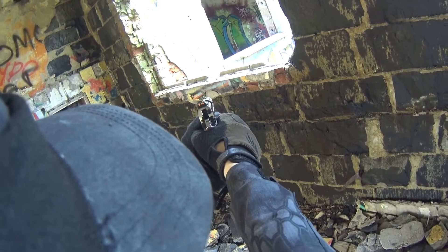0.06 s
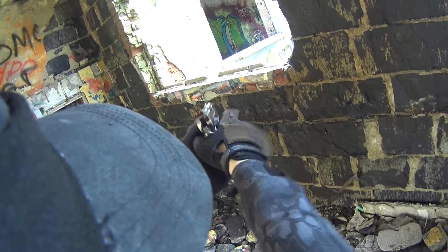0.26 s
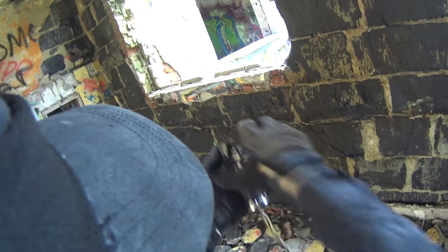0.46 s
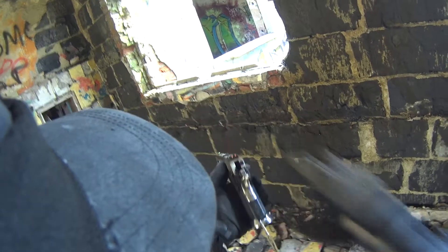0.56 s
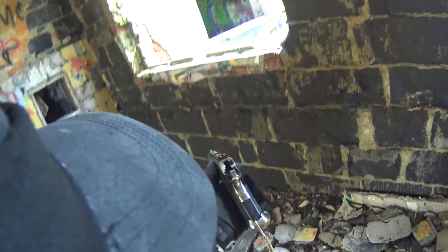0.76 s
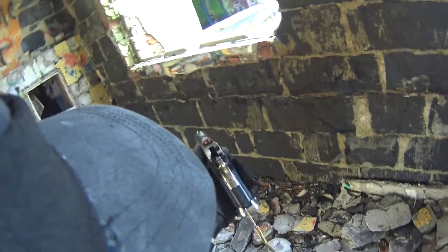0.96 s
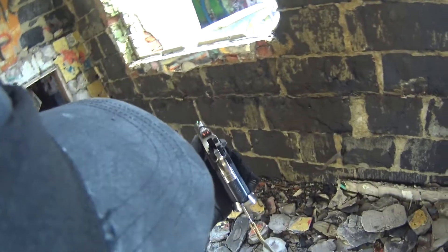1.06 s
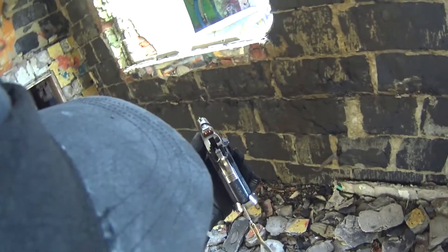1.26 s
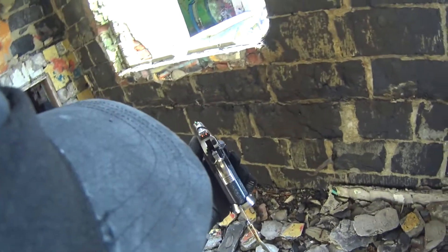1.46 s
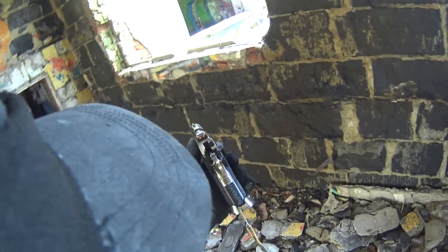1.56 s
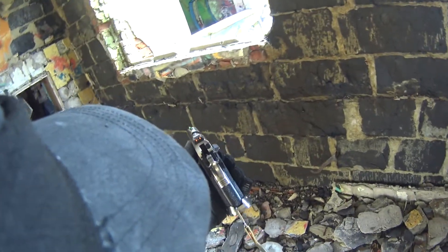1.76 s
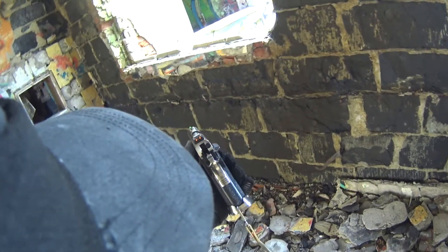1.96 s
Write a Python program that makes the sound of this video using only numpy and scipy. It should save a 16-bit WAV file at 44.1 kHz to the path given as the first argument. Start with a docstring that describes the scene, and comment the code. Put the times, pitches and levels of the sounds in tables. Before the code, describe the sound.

Toy pistol clicking and snapping in a gloved hand, with sleeve rustle and faint birds.

```python
"""Toy pistol in a brick ruin

A gloved hand works a toy pistol: a double click, a bright snap and small ticks ring its frame
and catch, and soft knocks land on the grip, over the rustle of glove and sleeve. The bare walls
answer faintly; distant birds whistle outside over a low rumble of air."""
import sys
import numpy as np
from scipy import signal
from scipy.fft import rfft, irfft, next_fast_len
from scipy.io import wavfile
from scipy.ndimage import map_coordinates

SR = 44100
rng = np.random.default_rng(int(sys.argv[2]) if len(sys.argv) > 2 else 0)


def digitize_waveform(pressure):
    """Quantize a signal to 16-bit integers and store it at the path in sys.argv[1].

    Rows of a 2-D input are taken as channels; values are limited to [-1, 1].
    """
    field = np.atleast_2d(pressure).T
    bounded = np.clip(field, -1, 1)
    quanta = np.round(bounded * 32767).astype(np.int16)
    wavfile.write(sys.argv[1], SR, quanta)


N = 88200


def amp(db):
    """Decibels to gain."""
    return 10 ** (np.asarray(db) / 20)


def unit(x):
    """x at rms 1."""
    return x / np.sqrt(np.mean(x ** 2) + 1e-20)


def along(points, hz):
    """Read a curve of (frequency [Hz], value) points on a log axis."""
    freqs, values = np.transpose(points)
    return np.interp(np.log(hz + 1), np.log(freqs + 1), values)


def fade(t, t60):
    """Exponential decay, 60 dB down at t60 seconds."""
    return np.exp(-np.log(1000) * t / t60)


def wobble(rate):
    """A smooth random curve, rate knots a second."""
    return map_coordinates(rng.standard_normal(int(N * rate / SR) + 4), [np.arange(N) * rate / SR])


def filtered(x, response):
    """EQ x with a gain that is a function of frequency."""
    n = x.shape[-1]
    padded = next_fast_len(n + 8192)
    return irfft(rfft(x, padded) * response(np.fft.rfftfreq(padded, 1 / SR)), padded)[..., :n]


def causal(gain):
    """The most compact (minimum-phase) impulse response with these gains."""
    cepstrum = irfft(np.log(np.maximum(gain, 1e-6)))
    half = len(cepstrum) // 2
    cepstrum[1:half] *= 2
    cepstrum[half + 1:] = 0
    return irfft(np.exp(rfft(cepstrum)))


def add(track, start, sound):
    """Mix a sound into a track at start seconds."""
    i = round(start * SR)
    part = sound[max(-i, 0):max(N - i, 0)]
    track[max(i, 0):][:len(part)] += part


# Stereo image, widest in the low mids (frequency [Hz], left-right correlation [0-1])
STEREO_IMAGE = [(30, 0.97), (70, 0.98), (170, 0.82), (350, 0.092), (700, 0.067), (1400, 0.72), (2800, 0.8),
                (8000, 0.77)]
def spread(pair, colour):
    """Two unrelated signals become a coloured stereo sound of rms 1."""
    def mid_side_gains(hz):
        angle = np.arccos(np.clip(along(STEREO_IMAGE, hz), -1, 1)) / 2
        return amp(along(colour, hz)) * [np.cos(angle), np.sin(angle)]
    mid, side = filtered(pair, mid_side_gains)
    return unit(np.array([mid + side, mid - side]))


def reverb(x, decay):
    """Diffuse stereo reflections of x at about its energy; decay is (frequency [Hz], t60 [s])."""
    hz, t, noise = signal.stft(rng.standard_normal((2, SR // 2)), SR, nperseg=256)
    tail = signal.istft(noise * fade(t, along(decay, hz)[:, None]), SR, nperseg=256)[1]
    tail = spread(tail, [(1, 0)])
    return signal.fftconvolve(x[None], tail / np.linalg.norm(tail[0]), axes=1)[:, :N]


# EQ of the air bed (frequency [Hz], gain [dB])
AIR_EQ = [(10, -16), (30, -2), (60, -9), (120, -13.5), (250, -15.5), (600, -18.5), (1000, -22.5),
          (2500, -46), (5000, -38), (9000, -45), (11000, -46), (12000, -102)]
def air():
    """Outdoor air: a steady, low rumble of noise."""
    return amp(-56.5) * spread(rng.standard_normal((2, N)), AIR_EQ)


# Bird calls (time [s], length [s], start pitch [Hz], end pitch [Hz], level [dB], rasp [0-1])
BIRD_CALLS = [(-.04, 0.21, 3990, 4044, -52, 0.29), (-.02, 0.14, 2794, 2680, -53.5, 0.16),
              (0.242, 0.19, 4970, 4920, -49, 0.5), (0.528, 0.079, 5930, 5500, -54, 0.77),
              (0.721, 0.063, 3450, 3400, -54, 0.17), (0.8, 0.27, 4136, 4080, -58.5, 0.16),
              (.88, 0.088, 2730, 2910, -52.5, 0.22), (.99, 0.07, 3480, 3490, -55.5, 0.19),
              (1.212, 0.053, 3445, 3510, -51, 0), (1.238, 0.322, 4110, 4085, -59.5, 0.02),
              (1.28, 0.15, 2506, 2545, -55.5, .2), (1.577, 0.22, 3564, 3517, -53.5, 0),
              (1.68, 0.1, 4660, 4620, -60, 0.12), (1.704, 0.12, 2910, 2890, -57.5, 0.03),
              (1.81, 0.13, 4700, 4600, -62, 0), (1.928, 0.062, 2750, 2810, -56.5, 0.26)]
def birds():
    """Thin, trembling whistles, smeared by distance; in a raspy call pitch and level shake fast."""
    waver_hz, tremble_db, rasp_hz, rasp_db = 30.3, 1.5, 220, 3  # modulation depths
    edge_s, sag_db, trees_t60_s = 0.0096, 6, 0.45
    calls = np.zeros(N)
    for start, length, start_hz, end_hz, db, rasp in BIRD_CALLS:
        t = np.arange(int(length * SR)) / SR
        glide = start_hz + (end_hz - start_hz) * t / length
        waver = waver_hz * wobble(311.4) + rasp * rasp_hz * wobble(912)
        tone = np.sin(2 * np.pi * np.cumsum(glide + waver[:len(t)]) / SR)
        tremble = amp(tremble_db * wobble(111.7) + rasp * rasp_db * wobble(413))
        edges = np.clip(np.minimum(t, length - t) / edge_s, 0, 1)
        sag = amp(sag_db * (.5 - t / length))  # each call weakens as it goes
        add(calls, start, amp(db) * edges * sag * unit(tremble[:len(t)]) * tone)
    return amp(-1) * calls + amp(-7) * reverb(calls, [(3000, trees_t60_s)])


# Fader ride of the rustle (time [s], level [dB])
RUSTLE_RIDE = [(0, -58), (.16, -54.5), (0.209, -46.5), (.28, -47.5), (.34, -47.5), (0.419, -45.5),
               (.55, -47.5), (.62, -42.5), (.72, -45.5), (.8, -46.5), (0.867, -44.5), (.95, -52),
               (1.05, -49.5), (1.17, -51.5), (1.541, -54), (1.61, -48.5), (1.68, -58), (1.8, -53),
               (2, -55.5)]
# EQ of the cloth (frequency [Hz], gain [dB])
CLOTH_EQ = [(200, -23), (600, -12), (1050, -16), (1270, -0.5), (1550, -7.5), (1800, -2), (2050, -9),
            (2500, 1.5), (3200, -7.5), (4800, -10), (6000, -18.5), (8400, -23), (9500, -35.5),
            (11000, -34.5), (12000, -133)]
def rustle():
    """Glove and sleeve rub: a fluttering hiss dotted with tiny crease ticks."""
    creases_per_s, crease_db, scatter_db, flutter_db = 400, -10, 8, 1
    level_db = np.interp(np.arange(N) / SR, *np.transpose(RUSTLE_RIDE)) + flutter_db * wobble(44.81)
    onsets = rng.random((2, N)) < creases_per_s / SR
    creases = onsets * amp(scatter_db * np.clip(rng.standard_normal((2, N)), -2, 2))
    hiss = rng.standard_normal((2, N))
    return amp(level_db) * spread(hiss + amp(crease_db) * unit(creases), CLOTH_EQ)


def strike(modes, tilt_db, contact_hz):
    """One hit of peak 1: damped modes, boosted at the contact's pitch and rolled off above it."""
    shell_hz = 1323  # the small shell radiates little below this
    boost_db, boost_octaves = 4, .25
    chatter_db, chatter_t60_s = -11, 0.021
    size = SR // 10
    hz, t = np.fft.rfftfreq(size, 1 / SR), np.arange(size) / SR
    power = sum(amp(2 * db) / (1 + ((hz - mode_hz) * 2 * np.pi * t60 / np.log(1000)) ** 2)
                for mode_hz, db, t60 in modes)
    passband = 1 / np.sqrt((1 + (shell_hz / (hz + 1)) ** 16) * (1 + (hz / contact_hz) ** 8))
    tilt = amp(tilt_db * np.log2(np.maximum(hz / shell_hz, 1)))
    boost = amp(boost_db * np.exp(-(np.log2((hz + 1) / contact_hz) / boost_octaves) ** 2))
    ring = causal(np.sqrt(power) * passband * tilt * boost)
    burst = fade(t, chatter_t60_s) * rng.standard_normal(size)
    chatter = signal.fftconvolve(ring, burst / np.linalg.norm(burst))[:size]
    hit = ring + amp(chatter_db) * chatter
    return hit / np.abs(hit).max()


# Ring of the frame (frequency [Hz], level [dB], t60 [s])
FRAME_MODES = [(1330, -13, .014), (1900, -2.5, .009), (2450, 2, .009), (2780, 1, .007), (3170, 3, .009),
               (4020, -9, .008), (4450, -9, .008), (5750, -15, .004), (7500, -22, .003)]
# Light taps (time [s], level [dB], brightness [dB/octave], contact pitch [Hz])
CLICK_CUES = [(0.162, -36, -2, 1740), (0.2182, -19.5, 0.5, 6700), (0.2322, -15, 1, 7300),
              (0.2786, -31, 0, 4060), (0.314, -36, 1, 2760), (0.563, -36, -3, 3500),
              (1.015, -31.5, -8.5, 4900), (1.5514, -40.5, -17, 2000), (1.9125, -39.5, -15, 1820),
              (1.9704, -32, -9, 2300)]
def clicks():
    """Parts of the mechanism tap the frame: a double click and small ticks."""
    out = np.zeros(N)
    for start, db, tilt_db, contact_hz in CLICK_CUES:
        add(out, start, amp(db) * strike(FRAME_MODES, tilt_db, contact_hz))
    return out


# Reverb time of the ruin (frequency [Hz], t60 [s])
WALL_DECAY = [(300, 0.91), (2500, 0.4), (7000, 0.2), (11500, 0.024)]
def walls(pistol):
    """Bare walls answer the pistol with tight early reflections and a faint, dark tail."""
    brick_hz = 6200  # rough brick swallows the treble above this
    dulled = filtered(pistol, lambda hz: 1 / np.sqrt(1 + (hz / brick_hz) ** 4))
    tail = amp(-12.5) * reverb(dulled, WALL_DECAY)
    early = amp(-6.5) * reverb(dulled, [(3000, 0.031)])
    return early + tail


# Ring of the catch (frequency [Hz], level [dB], t60 [s])
CATCH_MODES = [(1750, 6, .03), (2300, -1, .008), (2720, 1, .009), (3520, 3, .011), (3800, 7, .011),
               (4430, -5, .011), (5190, 0, .011), (5860, 0, .011), (6800, 5, .008), (7850, 1, .007),
               (8400, -2, .008), (11000, -14, .006)]
# Light touches, and the snap's slip, hit and rebound (time [s], level [dB], contact pitch [Hz])
CATCH_CUES = [(0.3743, -35, 6600), (0.5139, -24.5, 4700), (.586, -30, 11600), (0.5866, -12.3, 11800),
              (0.5877, -23, 11500), (0.7564, -23, 5000)]
def snap():
    """The catch is nudged, snaps home and is touched again."""
    out = np.zeros(N)
    for start, db, contact_hz in CATCH_CUES:
        add(out, start, amp(db) * strike(CATCH_MODES, tilt_db=0, contact_hz=contact_hz))
    return out


# Dull scuffs (peak time [s], half length [s], level [dB], pitch [Hz])
SCUFF_CUES = [(0.476, 0.067, -60, 173), (0.653, 0.12, -59.5, 93), (0.716, 0.032, -53.5, 276),
              (1.035, 0.047, -54.5, 490)]
def scuffs():
    """The moving arm brushes the clothes in short, low swells of noise."""
    step_octaves = 0.57
    out, t = np.zeros((2, N)), np.arange(N) / SR
    for peak_s, half_s, db, hz in SCUFF_CUES:
        band = [(hz * 2 ** (k * step_octaves), -5 * k * k) for k in range(-4, 5)]
        swell = np.exp(-((t - peak_s) / half_s) ** 2)
        out += amp(db) * swell * spread(rng.standard_normal((2, N)), band)
    return out


# Hand on grip (time [s], level [dB], pitch [Hz], t60 [s], frame ring against the thud [dB])
KNOCK_CUES = [(0.6441, -33, 726, 0.0089, 0.5), (0.8, -45, 188, 0.017, 2), (0.895, -31, 610, 0.013, -8),
              (1.1236, -38.5, 330, 0.012, -2.5), (1.9072, -40, 137, 0.0063, -5)]
def knocks():
    """A padded contact gives a short low thud and a dull ring of the frame."""
    attack_s = 0.00022
    out, t = np.zeros(N), np.arange(SR // 10) / SR
    for start, db, hz, t60, ring_db in KNOCK_CUES:
        thud = np.sin(2 * np.pi * hz * t) * fade(t, t60) * (1 - np.exp(-t / attack_s))
        ring = amp(ring_db) * strike(FRAME_MODES, tilt_db=-5, contact_hz=1840)
        add(out, start, amp(db) * (thud / np.abs(thud).max() + ring))
    return out


def scene():
    """The mix: pistol and cloth up close, walls, air and birds behind."""
    lean_left = np.array([[1], [-1]])
    frame, catch, grip = clicks(), snap(), knocks()
    direct = frame * amp(0.7 * lean_left) + catch * amp(-0.5 * lean_left) + grip
    return direct + walls(frame + catch + grip) + air() + rustle() + scuffs() + birds()


def record(dry):
    """Master EQ: the top treble rolls off, then cuts out."""
    top_hz = 12280
    rolloff = [(11200, 0), (top_hz, -27)]
    return filtered(dry, lambda hz: amp(along(rolloff, hz)) * (hz < top_hz))


dry = scene()
out = record(dry)
digitize_waveform(out)
```